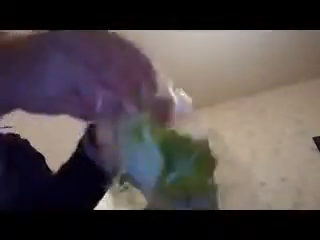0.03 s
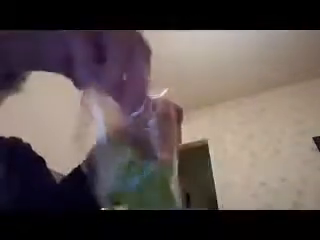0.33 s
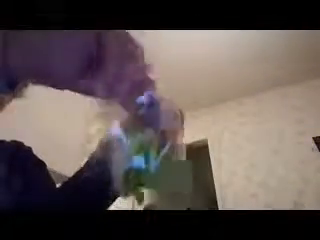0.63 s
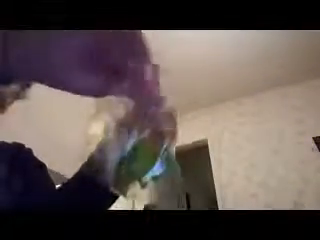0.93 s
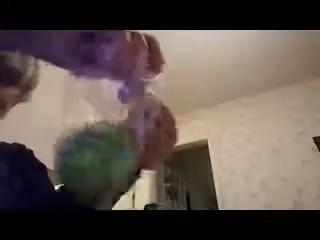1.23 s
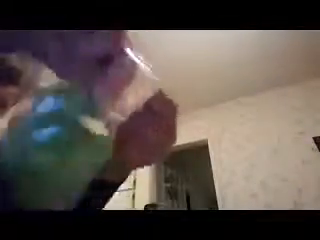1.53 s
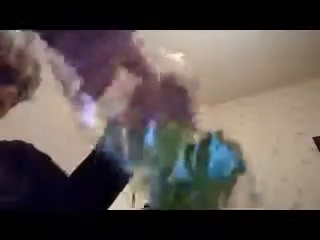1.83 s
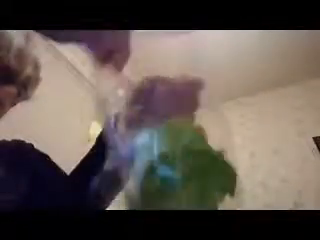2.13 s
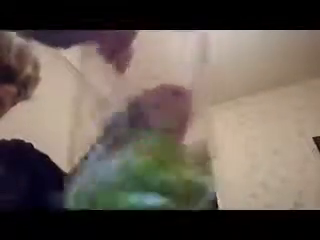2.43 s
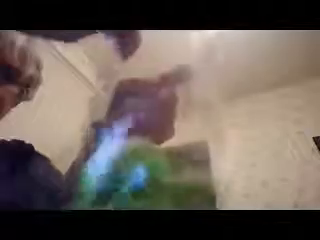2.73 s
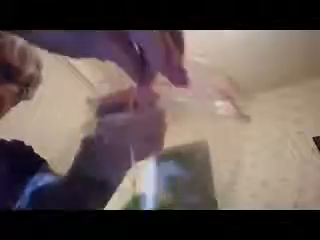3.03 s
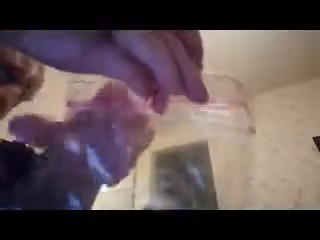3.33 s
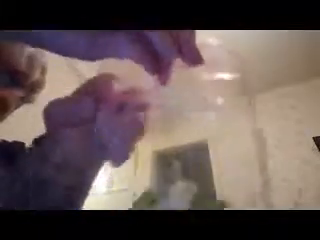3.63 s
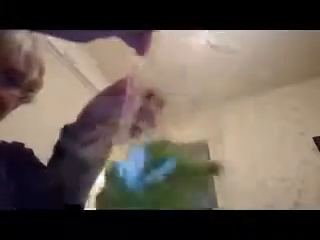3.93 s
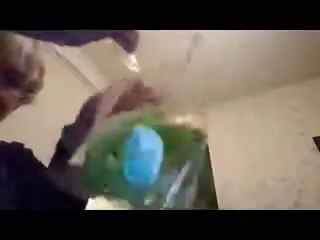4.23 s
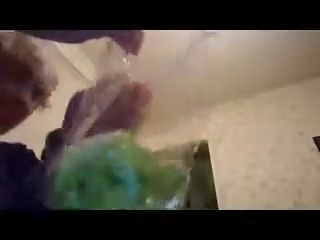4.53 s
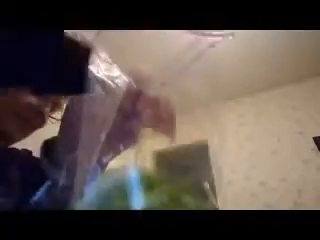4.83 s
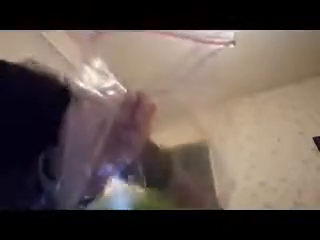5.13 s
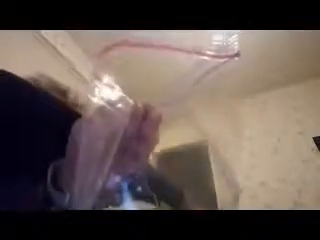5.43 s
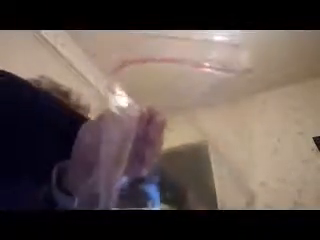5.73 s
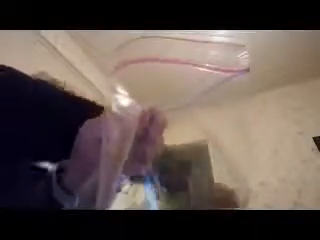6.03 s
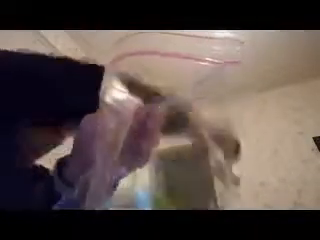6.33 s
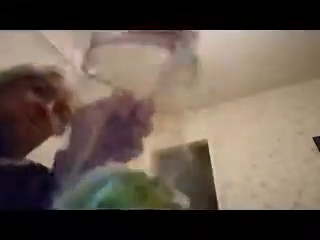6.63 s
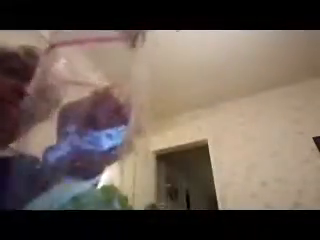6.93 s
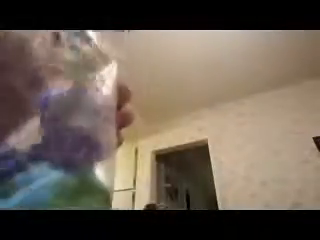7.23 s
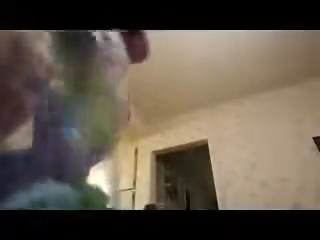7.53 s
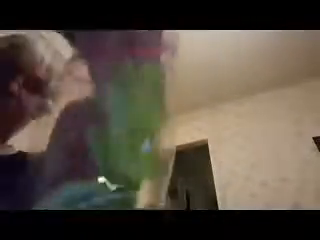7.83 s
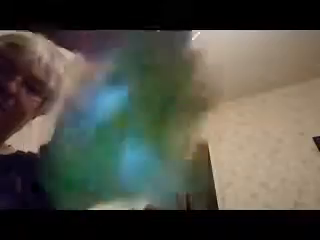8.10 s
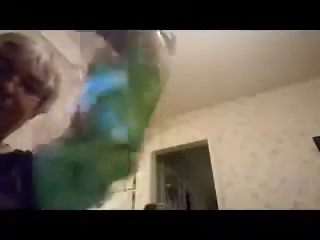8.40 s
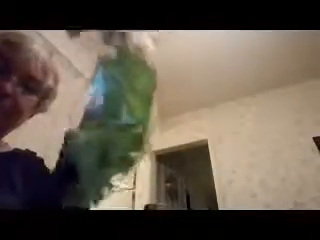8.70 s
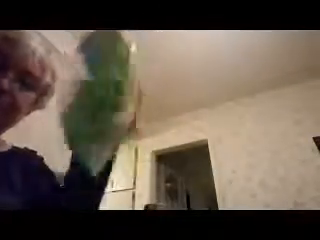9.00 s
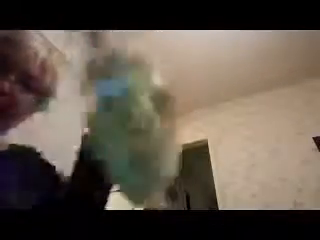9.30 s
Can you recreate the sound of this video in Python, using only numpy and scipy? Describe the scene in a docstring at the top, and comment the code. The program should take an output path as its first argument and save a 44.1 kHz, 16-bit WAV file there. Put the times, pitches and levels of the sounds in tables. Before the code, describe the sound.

Close to the microphone, hands work a thin plastic bag of leafy greens in a small, quiet room. Each squeeze brings a swarm of bright crackles, sharp snaps and dull flaps of plastic. The handling thins to scattered ticks and a hollow pop, and the bag rests almost still over a faint low hum. Then a hand reaches in and the crinkling returns, ending on a loud snap.

```python
"""Crackles and loud snaps: hands work a thin plastic bag of leafy greens, close up, in a small, quiet room.
Each squeeze buckles a swarm of creases. Wide panels of film flap dully, mid-size folds pop, small facets
tick; now and then a panel flips with a thump or a hollow knock. The bag is held nearly still for a while,
over a low room hum, then a hand reaches in for the greens."""
import sys
import numpy as np
from scipy import signal
from scipy.fft import rfft, irfft
from scipy.io import wavfile
from scipy.ndimage import uniform_filter1d

SR = 44100
rng = np.random.default_rng(int(sys.argv[2]) if len(sys.argv) > 2 else 0)


def output_pcm(signal):
    """Save a mono or channel-first signal as 16-bit PCM at the path in sys.argv[1].

    Samples are clipped to [-1, 1] before scaling.
    """
    pcm = np.clip(np.atleast_2d(signal).T, -1, 1) * 32767
    wavfile.write(sys.argv[1], SR, np.round(pcm).astype(np.int16))


N = 421596
TIME_S = np.arange(N) / SR

# Fold sizes flap, pop, tick: (low [Hz], high [Hz], burst [s], size spread [dB], sliding share [0-1])
FOLD_SIZES = [(31.3, 467, 0.0012, 2.5, 0), (447.3, 2700, 0.00041, 4.5, 0.37),
              (2864, 13620, 0.00031, 3.5, 0.72)]
# Film colour: (frequency [Hz], relative density [dB])
FILM_SPECTRUM = [(18, -46), (30, -15), (92, 4), (178, 4), (520, 0), (780, -2.5), (1050, -1.5), (1400, -6.5),
                 (2030, -1.5), (2620, -12), (5620, -5.5), (7820, -3.5), (9580, -5), (11400, -12),
                 (13000, -37.5)]
# Held bag stirring between squeezes: (time [s], flap level [dB], crackle level [dB])
STIR_LEVELS = [(0.0, -48.5, -62), (0.8, -47.5, -47), (1.4, -50.5, -55), (2.2, -53, -54.5),
               (2.75, -46.5, -40.5), (3.45, -53, -61), (4.08, -55, -49), (4.2, -55, -68), (4.5, -57, -50.5),
               (5.1, -66, -67.5), (6.1, -57.5, -72), (6.7, -71, -74), (7.35, -63, -75.5), (7.9, -49.5, -48),
               (8.45, -46, -44.5), (8.83, -57.5, -58.5), (9.15, -49.5, -50.5), (9.56, -42, -45.5)]
# Hands squeeze or pull: (time [s], hold [s], level [dB], tick minus pop [dB])
HAND_SQUEEZES = [(0.033, 0.043, -39, 0.5), (0.115, 0.16, -41.5, 2), (0.363, 0.19, -40, 0),
                 (0.946, 0.068, -38.5, 7), (1.115, 0.083, -44.5, 7.5), (1.231, 0.082, -39.5, 4.5),
                 (1.523, 0.033, -40, 1.5), (1.621, 0.099, -34, 4.5), (1.835, 0.016, -31.5, 4.5),
                 (1.903, 0.13, -38, 4), (2.326, 0.018, -50.5, -2), (2.519, 0.069, -36, 2),
                 (2.646, 0.019, -35.5, -0.5), (2.8, 0.074, -43, 2), (2.898, 0.17, -40, 1.5),
                 (3.12, 0.0086, -47, 7), (3.289, 0.015, -41.5, 4), (3.398, 0.04, -47, 1),
                 (3.538, 0.17, -49, -1), (3.705, 0.022, -39, 0), (3.854, 0.027, -36.5, 2),
                 (3.92, 0.069, -42.5, -1), (4.28, 0.032, -50.5, -4.5), (4.394, 0.05, -46.5, -2),
                 (4.673, 0.098, -47.5, 3.5), (4.893, 0.0067, -45, -2), (5.29, 0.007, -46, 3),
                 (5.62, 0.13, -56.5, -3), (5.79, 0.0056, -35.5, 5.5), (5.94, 0.026, -51.5, -1),
                 (6.07, 0.013, -55.5, 1.5), (6.185, 0.026, -59, 3.5), (6.31, 0.024, -57.5, -0.5),
                 (6.454, 0.018, -64.5, 7), (6.95, 0.074, -68.5, -2), (7.437, 0.004, -55.5, 6),
                 (7.557, 0.066, -56.5, -7), (7.691, 0.14, -44.5, 3), (7.954, 0.096, -43.5, 1),
                 (8.086, 0.066, -34.5, 1), (8.21, 0.16, -38, 2.5), (8.581, 0.072, -36, 2.5),
                 (8.925, 0.036, -50, 4), (8.995, 0.025, -57.5, -11), (9.15, 0.18, -42.5, 2),
                 (9.32, 0.032, -30.5, 3), (9.41, 0.051, -34, 0.5), (9.528, 0.008, -26.5, -0.5)]
# Greens rub on the wide panels: (time [s], hold [s], level [dB])
LEAF_RUBS = [(0.177, 0.14, -48.5), (1.622, 0.17, -42.5), (2.635, 0.043, -41), (3.295, 0.13, -55),
             (3.835, 0.11, -53.5), (4.386, 0.13, -53), (4.66, 0.13, -62), (8.584, 0.051, -41.5),
             (9.52, 0.04, -35)]
# Room noise: (frequency [Hz], relative density [dB])
AIR_SPECTRUM = [(18, -51), (30, -27), (49, -9), (131, -29), (165, -5.5), (281, -11.5), (353, -13.5),
                (432, -13.5), (1260, -27.5), (2690, -32.5), (8880, -53), (12000, -33.5), (13000, -29)]
# Room hum: (frequency [Hz], rms level [dB])
HUM_TONES = [(161.5, -65), (355.3, -67), (484.5, -72), (624.5, -75.5)]
# Single creases snap through: (time [s], level [dB], tick minus pop [dB], pop [Hz], tick [Hz])
CREASE_SNAPS = [(0.057, -38, 0, 1400, 5400), (0.07, -40, 1, 1100, 5600), (0.135, -37, 4.5, 1170, 7240),
                (0.1535, -39, 8, 1768, 7260), (0.2125, -39.5, 8, 1100, 5600), (0.376, -42, -5, 1000, 5600),
                (0.419, -36, 1, 1300, 7500), (0.4464, -36, 7, 1160, 6540), (0.459, -36.5, 4.5, 1260, 5600),
                (0.5165, -41, 9, 936, 9245), (0.5528, -37, 7, 1310, 9200), (0.6103, -41, -5.5, 1620, 5090),
                (0.7005, -55, 6, 1500, 4500), (0.7086, -43, 1, 1103, 5700),
                (0.7475, -39.5, 6.5, 1450, 6440), (0.8169, -56, 1, 1810, 4210),
                (0.8652, -41, -0.5, 1517, 6413), (0.8765, -43.5, 13, 882, 8700),
                (0.939, -40, 2, 1327, 6860), (0.9578, -40, 10.5, 1580, 5350),
                (0.9877, -34.5, 9, 1440, 6000), (1.0085, -30.5, 11, 1498, 8780),
                (1.0847, -42.5, -9.5, 1766, 3864), (1.1245, -44.5, 17, 1575, 8720),
                (1.1494, -41, 3, 1764, 8124), (1.1664, -32.5, 7, 1050, 8400), (1.2134, -32, 4, 1340, 8300),
                (1.2292, -37, 16, 1760, 8367), (1.238, -34, 5, 1410, 5430), (1.253, -31, 1, 1420, 4160),
                (1.3043, -30, 2, 1460, 4930), (1.3454, -35.5, 4.5, 1390, 4230),
                (1.3873, -36, 3, 1540, 3720), (1.4224, -42, -14, 1040, 3890),
                (1.4795, -45, -1.5, 733, 5190), (1.4873, -38.5, 1.5, 1470, 5530),
                (1.545, -38.5, 8, 1227, 5270), (1.5663, -35.5, 4, 1445, 5420), (1.6089, -35, -7, 990, 5610),
                (1.6232, -27.5, -4, 885, 5640), (1.628, -31.5, -2, 750, 5000),
                (1.6355, -31.5, 5, 1100, 5600), (1.655, -33, 8, 1200, 6000), (1.6626, -42, 3, 1160, 5900),
                (1.6856, -33, -2, 859, 6000), (1.697, -34.5, -5, 650, 3300), (1.8286, -33, 2, 1680, 5560),
                (1.837, -29, -5, 1070, 5400), (1.8474, -29, 8, 1510, 6130), (1.8883, -35.5, 0, 1500, 6000),
                (1.9124, -32.5, 6.5, 1740, 7800), (1.9235, -32.5, 0, 810, 5300),
                (1.9806, -35, 11, 1170, 6500), (1.989, -30.5, 6, 1535, 5760), (2.022, -35, 6, 1820, 4900),
                (2.0529, -33, -1, 810, 3880), (2.0738, -37, 5, 1981, 6770), (2.1133, -49, 0.5, 1093, 4490),
                (2.181, -54, 12, 1500, 5000), (2.2348, -54, 6, 763, 5230), (2.2492, -52.5, 9, 1900, 6000),
                (2.365, -40, 0, 868, 3653), (2.4685, -36.5, 4, 1105, 7900), (2.5382, -30.5, 1, 1140, 7100),
                (2.5575, -31.5, -2, 1100, 5800), (2.587, -35, -5, 897, 5200), (2.6515, -37, -3, 1300, 6000),
                (2.6586, -33.5, 11, 987, 9500), (2.6669, -38, -14.5, 2000, 5900),
                (2.6845, -34.5, -2, 1200, 4600), (2.7398, -43, -6, 1478, 6013),
                (2.8017, -33, 1, 1360, 5830), (2.878, -38.5, 2, 1814, 4000), (2.918, -33.5, 7, 1200, 9500),
                (2.9285, -32.5, 2.5, 1490, 7100), (2.9442, -36, 3, 1890, 4272),
                (2.9946, -35, -1, 1080, 5200), (3.0255, -32, 6, 1140, 7040), (3.066, -37, -7, 1700, 4800),
                (3.1177, -36, 1, 1380, 6500), (3.1345, -43, 5, 991, 5463), (3.2017, -46, -10.5, 1390, 4717),
                (3.2225, -47.5, -7, 1600, 4500), (3.3018, -34.5, -2, 1630, 7700),
                (3.3171, -38.5, 8, 1346, 6852), (3.3411, -41, 1, 2210, 4930), (3.382, -40, 2, 1346, 6300),
                (3.434, -34.5, -4, 1300, 4750), (3.4936, -51, 6, 1421, 4843),
                (3.5105, -44, -2.5, 1570, 4500), (3.639, -51, 10, 665, 6512), (3.695, -31, 2, 2000, 7720),
                (3.718, -29, 3, 1230, 10000), (3.816, -47.5, 2, 1420, 4800), (3.8237, -38, 3, 1630, 6130),
                (3.8568, -30.5, 10, 1080, 9100), (3.8734, -30.5, 5, 992, 7300),
                (3.896, -40, 24, 1190, 7500), (3.928, -30.5, 1.5, 996, 7860), (3.9718, -44, -6, 1166, 5487),
                (3.9853, -37.5, 2, 1190, 4740), (4.0741, -44, 5, 1380, 5800),
                (4.143, -48.5, -17, 810, 4120), (4.154, -48, -6, 1360, 4200),
                (4.226, -47.5, -6, 1040, 4180), (4.2983, -47, 5, 1400, 5000), (4.3311, -43.5, 0, 987, 4762),
                (4.3468, -47, -5, 1044, 4523), (4.3922, -41, 1, 1610, 4850), (4.4473, -48, -1, 1340, 4170),
                (4.4943, -47.5, 14, 1262, 5900), (4.5871, -51.5, 1.5, 1773, 4539),
                (4.6437, -39, -2.5, 1970, 5200), (4.6869, -41, 4.5, 700, 5260),
                (4.7158, -35, 8, 1670, 6300), (4.7564, -41, 0, 1610, 5700), (4.7753, -41, 3.5, 1250, 5500),
                (4.8977, -38.5, -4, 1540, 5360), (5.291, -43.5, 3, 1500, 5770),
                (5.3067, -41.5, 1, 1030, 6030), (5.61, -52.5, -2, 1270, 8680),
                (5.6371, -50.5, -10, 763, 4440), (5.7852, -30, -1.5, 1710, 4600),
                (5.9589, -44, 14, 790, 10100), (6.0007, -50.5, -7, 1066, 4620),
                (6.1805, -50, 2.5, 1660, 9800), (6.3247, -46.5, -14, 1800, 3300),
                (7.036, -59.5, -6, 1770, 4400), (7.4407, -41, 5.5, 1320, 5300),
                (7.5471, -44.5, 2, 1010, 4300), (7.5676, -54, 4, 1117, 4104),
                (7.619, -46.5, -5, 1430, 3430), (7.6947, -34.5, 13, 1015, 8400),
                (7.7421, -34, -1, 1010, 7180), (7.8208, -38, 4, 880, 9900), (7.8887, -40.5, 9, 1324, 7750),
                (7.9193, -47, 8, 1485, 6000), (7.9354, -36, -2.5, 2000, 6200), (8.0056, -32, 0, 1710, 5800),
                (8.0694, -35, -4, 814, 4900), (8.1442, -35, 18, 1210, 10200), (8.1766, -34, 2, 1220, 8500),
                (8.2205, -31, -10, 800, 4800), (8.229, -31, 3, 1200, 4800), (8.2663, -29.5, 1.5, 890, 4220),
                (8.3048, -34, -8, 1010, 3500), (8.319, -48, 2, 1100, 6000), (8.3406, -36.5, 12, 1600, 9150),
                (8.4008, -34.5, -4, 1070, 5200), (8.4709, -48, 2, 1500, 4970), (8.5014, -47, -9, 777, 6432),
                (8.5693, -36.5, 14, 1104, 8900), (8.5996, -29.5, -1, 1470, 5600),
                (8.632, -35.5, 18, 1350, 9600), (8.7064, -42, 4, 1169, 5760),
                (8.7971, -56, -11, 1665, 4553), (8.8065, -48, -4, 2100, 3880),
                (8.9326, -44, 9.5, 2080, 5630), (8.964, -35.5, -0.5, 1640, 4660),
                (9.102, -44.5, -5.5, 1174, 3140), (9.152, -43, 11, 1341, 8080),
                (9.1628, -37.5, -3.5, 970, 3760), (9.2555, -35, 3, 1440, 4740),
                (9.5277, -25, -9, 1190, 6170)]
# Taut panels pop over: (time [s], level [dB], pitch [Hz])
PANEL_KNOCKS = [(0.2535, -29.5, 566), (0.2602, -27, 832), (5.785, -26.5, 1290), (6.0014, -40, 1010),
                (6.1815, -40.5, 960), (6.3238, -29.5, 840)]
# Wide panels flip over: (time [s], level [dB], pitch [Hz])
PANEL_THUMPS = [(0.287, -36, 179), (0.553, -39.5, 350), (0.782, -38, 230), (0.937, -38, 190),
                (0.995, -35, 100), (1.255, -30.5, 161), (1.539, -32, 210), (1.628, -32, 230),
                (1.7, -32, 164), (1.842, -26, 243), (2.365, -40, 241), (2.414, -49, 150),
                (2.457, -31.5, 158), (2.585, -30, 320), (2.651, -32, 270), (2.803, -33, 220),
                (2.928, -33.5, 281), (3.304, -36, 309), (3.381, -35, 127), (3.433, -33, 301),
                (3.695, -32.5, 207), (4.83, -46, 100), (4.895, -33.5, 89), (6.0, -45, 220),
                (7.443, -40.5, 264), (7.7, -36.5, 200), (8.009, -33, 210), (8.072, -30, 370),
                (8.12, -34.5, 260), (8.257, -30.5, 270), (8.64, -29, 240), (8.708, -37, 240),
                (9.347, -31, 180), (9.492, -30, 290), (9.527, -24, 171)]
# Stereo width of the bag: (frequency [Hz], side gain [dB])
BAG_WIDTH = [(60, -4.5), (500, -4.5), (1300, .5), (2000, -2), (3000, 0)]
# Bag position, for flaps and pops: (time [s], left minus right [dB])
BAG_PAN = [(0, 1.5), (1.65, 2), (3.0, 1), (3.38, 4.5), (3.7, 1.5), (4.85, -0.5), (5.25, 2.5), (6.4, 4),
           (7.7, 0.5), (9.56, 0.5)]
# Width above TREBLE_HZ: (time [s], side gain [dB])
TREBLE_WIDTH = [(0, -56), (0.7, -32.5), (1.3, -21.5), (2.2, -21), (2.55, -60), (3.1, -29), (3.55, -4),
                (3.9, -21), (4.7, -23), (5.4, -45), (5.7, -3), (6.6, -29), (7.5, -2.5), (8.4, -42),
                (9.0, -37), (9.56, -65.5)]

FLAP, POP, TICK = range(3)
USUAL_SQUEEZE_DB = -39
ROOM_T60_S, ROOM_TAIL_DB = 0.4, -10
TREBLE_HZ, CUTOFF_HZ = 3900, 11650


def from_db(db):
    """Decibels to gain."""
    return np.exp(np.asarray(db) * (np.log(10) / 20))


def rms_one(x):
    """Scale to rms 1."""
    return x / np.sqrt(np.mean(x ** 2) + 1e-20)


def in_time(rows):
    """A curve's columns at every sample."""
    times_s, *columns = np.transpose(rows)
    return [np.interp(TIME_S, times_s, column) for column in columns]


def at_hz(points, hz):
    """Read a spectrum on a log-frequency axis."""
    points_hz, values = np.transpose(points)
    return np.interp(np.log(hz), np.log(points_hz), values)


def drift(rate_hz, step=40):
    """Smooth random wander, rms about 1."""
    pole = np.exp(-2 * np.pi * rate_hz * step / SR)
    noise = rng.standard_normal(N // step + 2002)
    slow = signal.lfilter([1], [1, -2 * pole, pole * pole], noise)[2000:]
    return np.interp(np.arange(N) / step, np.arange(len(slow)), rms_one(slow))


def band(x, low_hz, high_hz):
    """Band-pass filter."""
    return signal.sosfilt(signal.butter(2, [low_hz, high_hz], "band", fs=SR, output="sos"), x)


def stereo(mid, side, hz):
    """Left and right, at the bag's width for this pitch."""
    return mid + from_db(at_hz(BAG_WIDTH, hz)) * side * [[1], [-1]]


def fade(energy, decay_s):
    """Exponential decay of each burst; total energy is kept."""
    pole = np.exp(-1 / (decay_s * SR))
    return signal.lfilter([1 - pole], [1, -pole], energy + 1e-18)


def swell(start_s, hold_s, attack_db_per_s=275, release_db_per_s=269):
    """One hand movement rises, holds, lets go: (sample slice, envelope [dB])."""
    span = slice(*np.searchsorted(TIME_S, [start_s - .5, start_s + hold_s + .5]))
    t = TIME_S[span] - start_s
    return span, -attack_db_per_s * np.maximum(-t, 0) - release_db_per_s * np.maximum(t - hold_s, 0)


def handling(usual_flap_db=-50, flap_db_per_db=0.53, stir_tick_db=-1.03):
    """Stirring, squeezes and rubs add in power: flap, pop and tick levels [dB]."""
    stir_flap_db, crackle_db = in_time(STIR_LEVELS)
    power = from_db([stir_flap_db, crackle_db, crackle_db + stir_tick_db]) ** 2
    for start_s, hold_s, db, bright_db in HAND_SQUEEZES:
        span, envelope_db = swell(start_s, hold_s)
        flap_db = usual_flap_db + flap_db_per_db * (db - USUAL_SQUEEZE_DB)
        folds_db = [flap_db, db - bright_db / 2, db + bright_db / 2]
        power[:, span] += np.outer(from_db(folds_db), from_db(envelope_db)) ** 2
    for start_s, hold_s, db in LEAF_RUBS:
        span, envelope_db = swell(start_s, hold_s)
        power[FLAP, span] += from_db(db + envelope_db) ** 2
    return 10 * np.log10(power)


def crackles(buckles, sizes, spread_db, burst_s, scatter_db=1.5, window_s=0.33):
    """Power of a swarm of buckling creases; local mean about 1."""
    energy = buckles * from_db(spread_db * sizes + scatter_db * rng.standard_normal(N)) ** 2
    window = int(window_s * SR)
    local_mean = uniform_filter1d(uniform_filter1d(energy, window), window)
    return fade(fade(energy / np.maximum(local_mean, 1e-6), burst_s), burst_s)


def rustle(power, low_hz, high_hz, shift_ratio, wander_db=1.45, grain_db=0.83):
    """Film vibrates at the given power; half-octave bands wander slowly and from grain to grain."""
    edges_hz = np.geomspace(low_hz, high_hz, round(np.log2(high_hz / low_hz) * 2) + 2)
    noise = rng.standard_normal((2, 2, N)) * np.sqrt(power)
    out, power_gain = np.zeros((2, N)), 0
    for k, (lower_hz, upper_hz) in enumerate(zip(edges_hz, edges_hz[1:])):
        hz = np.sqrt(lower_hz * upper_hz)
        gain = from_db(at_hz(FILM_SPECTRUM, hz * shift_ratio))
        flicker = rms_one(from_db(wander_db * drift(rate_hz=14) + grain_db * drift(rate_hz=130)))
        out += gain * stereo(*band(noise[k % 2] * flicker, lower_hz, upper_hz), hz)
        power_gain += gain ** 2 * (upper_hz - lower_hz) / (SR / 2)
    return out / np.sqrt(power_gain)


def room_tone(air_db=-59.5, side_db=-5.0, waver_rad=0.96, waver_hz=6.8):
    """Dull room noise and wavering hum tones."""
    bins_hz = np.maximum(np.fft.rfftfreq(N, 1 / SR), 1)
    spectrum = rfft(rng.standard_normal((2, N))) * from_db(at_hz(AIR_SPECTRUM, bins_hz))
    mid, side = rms_one(irfft(spectrum, N))
    out = from_db(air_db) * (mid + from_db(side_db) * side * [[1], [-1]])
    for hz, db in HUM_TONES:
        out += from_db(db) * np.sqrt(2) * np.sin(2 * np.pi * hz * TIME_S + waver_rad * drift(waver_hz))
    return out


def snaps(fold, rows, crack_gain=0.23, spike=3.6, lead_s=.005, rise_s=0.00058, rms_window_s=.005):
    """A snap swells in briefly, then rings a damped facet of film."""
    low_hz, high_hz, burst_s = FOLD_SIZES[fold][:3]
    facet_q = (1.0, 2.3, 2.6)[fold]
    trim_db = (-1.0, -2.0, 1.0)[fold]
    t = TIME_S[:SR // 30] - lead_s
    envelope = np.exp(np.minimum(t / rise_s, -t / (2 * burst_s)) / 2)
    force = rng.standard_normal((len(rows), 2, len(t))) * envelope
    force[:, 0, np.argmax(envelope)] += spike   # snap-through, mid only
    out = np.zeros((2, N + len(t)))
    for (time_s, db, hz), burst in zip(rows, band(force, low_hz, high_hz)):
        ring = crack_gain * burst + signal.lfilter(*signal.iirpeak(hz, facet_q, fs=SR), burst)
        ring *= np.sqrt(rms_window_s * SR / np.sum(ring ** 2, axis=1, keepdims=True))
        start = int((time_s - lead_s) * SR)
        out[:, start:start + len(t)] += from_db(db + trim_db) * stereo(*ring, hz)
    return out[:, :N]


def lesser_snaps(levels_db, tries=260, still_db=-57, usual_db=-42, db_per_db=0.89, spread_octaves=0.47):
    """Chance snaps while the bag moves, following the rustle; columns as CREASE_SNAPS."""
    samples = rng.integers(SR // 30, N, tries)
    draws = np.clip(rng.standard_normal((tries, 3)), -1.5, 1.5)
    rows = []
    for i, (level_draw, pop_draw, tick_draw) in zip(samples, draws):
        _, pop_db, tick_db = levels_db[:, i]
        if tick_db > still_db:
            db = usual_db + db_per_db * ((pop_db + tick_db) / 2 - USUAL_SQUEEZE_DB) + 1.5 * level_draw
            bright_db = tick_db - pop_db - 0.5
            pop_hz = 1400 * 2 ** (spread_octaves * pop_draw)
            tick_hz = 5400 * 2 ** (spread_octaves * tick_draw)
            rows.append((i / SR, db, bright_db, pop_hz, tick_hz))
    return rows


def fold_blows(levels_db, flap_db=-12, flap_hz=165):
    """Snaps strike all fold sizes, thumps only flaps; per size: (time [s], level [dB], pitch [Hz])."""
    flaps, pops, ticks = list(PANEL_THUMPS), [], []
    for time_s, db, bright_db, pop_hz, tick_hz in list(CREASE_SNAPS) + lesser_snaps(levels_db):
        flaps.append((time_s, db + flap_db, flap_hz))
        pops.append((time_s, db - bright_db / 2, pop_hz))
        ticks.append((time_s, db + bright_db / 2, tick_hz))
    return flaps, pops, ticks


def knocks(rise_s=0.00056, decay_s=0.0018, overtone_ratio=2.07, overtone_db=-10.5, side_db=-1.0):
    """A taut panel pops over and rings a cycle or two in its two lowest modes."""
    t = TIME_S[:SR // 20]
    envelope = (1 - np.exp(-t / rise_s)) * np.exp(-t / decay_s)
    out = np.zeros((2, N))
    for time_s, db, hz in PANEL_KNOCKS:
        phase = 2 * np.pi * hz * t
        modes = np.exp(1j * phase) + from_db(overtone_db) * np.exp(1j * overtone_ratio * phase)
        ring = envelope / envelope.max() * modes
        start = int(time_s * SR)
        out[:, start:start + len(t)] += from_db(db) * stereo(ring.imag, from_db(side_db) * ring.real, hz)
    return out


def near_echoes(x, gain=0.18, sway_s=0.00015, sway_hz=0.97, count=6):
    """Hands and nearby surfaces reflect along short paths that shift as the bag moves."""
    out = x.copy()
    for delay_s in np.geomspace(.0016, .013, count) * rng.uniform(0.92, 1.15, count):
        delayed_s = TIME_S - delay_s - sway_s * drift(sway_hz)
        echo = np.array([np.interp(delayed_s, TIME_S, channel) for channel in x])
        out += gain * rng.choice([-1, 1]) * echo
    return out / np.sqrt(1 + count * gain ** 2)


def bag(creases_per_s=620, rate_db_per_db=.25, cluster_db=2.5, shift_octaves=0.053,
        rustle_trim_db=(-0.9, -3.1, 0.1)):
    """Harder handling buckles more creases, in clusters; each shakes all three fold sizes."""
    levels_db = handling()
    blows = fold_blows(levels_db)
    rate_db = rate_db_per_db * (levels_db[TICK] - USUAL_SQUEEZE_DB) + cluster_db * drift(rate_hz=45)
    buckles = rng.random(N) < creases_per_s * from_db(rate_db) / SR
    sizes = np.minimum(rng.exponential(1, N), 3.4)
    pop_shift = 2 ** (shift_octaves * drift(rate_hz=2.4))   # mid resonances move with the bag's shape
    layers = []
    for fold, (low_hz, high_hz, burst_s, spread_db, sliding) in enumerate(FOLD_SIZES):
        texture = sliding + (1 - sliding) * crackles(buckles, sizes, spread_db, burst_s)
        power = texture * from_db(levels_db[fold] + rustle_trim_db[fold]) ** 2
        hits = snaps(fold, blows[fold]) + (knocks() if fold == POP else 0)
        direct_power = power + hits.mean(axis=0) ** 2
        room_power = from_db(ROOM_TAIL_DB) ** 2 * fade(direct_power, ROOM_T60_S / np.log(10 ** 6))
        layers.append(hits + rustle(power + room_power, low_hz, high_hz, pop_shift if fold == POP else 1))
    flaps, pops, ticks = layers
    pan = from_db(in_time(BAG_PAN)[0] * [[.5], [-.5]])
    return flaps * pan + near_echoes(pops * pan + ticks)   # long waves bend round the hands


def scene():
    """The bag in the still room."""
    return bag() + room_tone()


def record(dry, notch_hz=7850, notch_depth=0.77, notch_q=1.99):
    """The treble narrows by a varying amount and has a dip; the top is cut steeply."""
    mid, side = (dry[0] + dry[1]) / 2, (dry[0] - dry[1]) / 2
    low_side = signal.sosfiltfilt(signal.butter(10, TREBLE_HZ, fs=SR, output="sos"), side)
    high_side = from_db(in_time(TREBLE_WIDTH)[0]) * (side - low_side)
    narrowed = mid + (low_side + high_side) * [[1], [-1]]
    notch_band = signal.lfilter(*signal.iirpeak(notch_hz, notch_q, fs=SR), narrowed)
    lowpass = signal.ellip(8, .3, 80, CUTOFF_HZ, fs=SR, output="sos")
    return signal.sosfilt(lowpass, narrowed - notch_depth * notch_band)


dry = scene()
out = record(dry)
output_pcm(out)
```